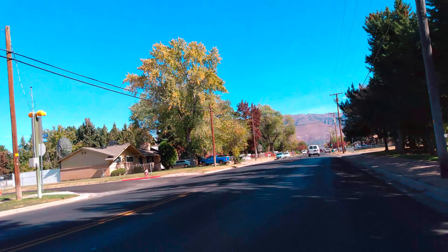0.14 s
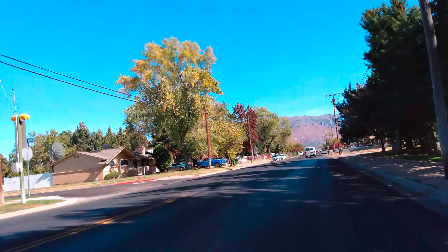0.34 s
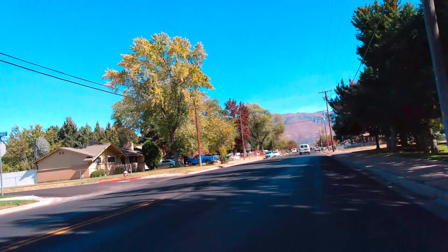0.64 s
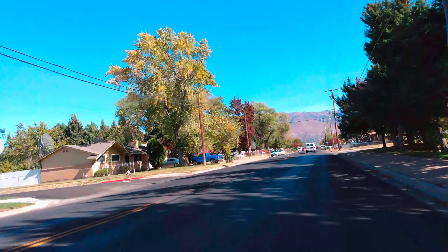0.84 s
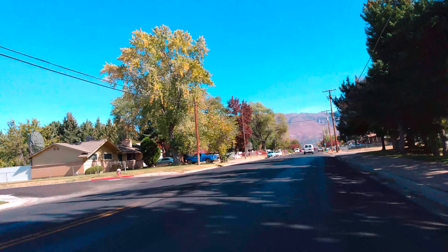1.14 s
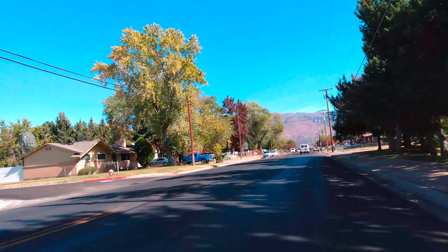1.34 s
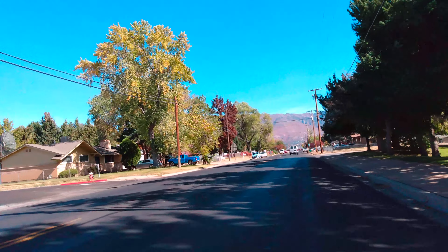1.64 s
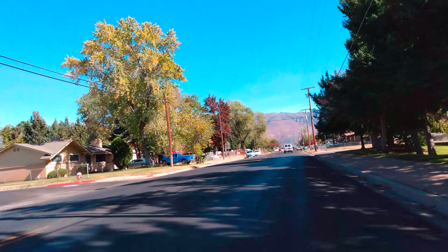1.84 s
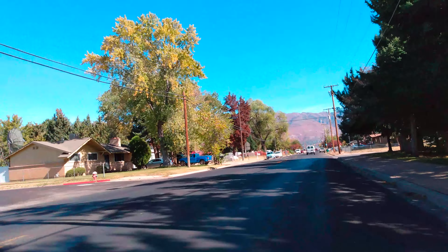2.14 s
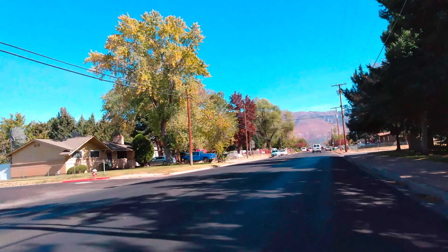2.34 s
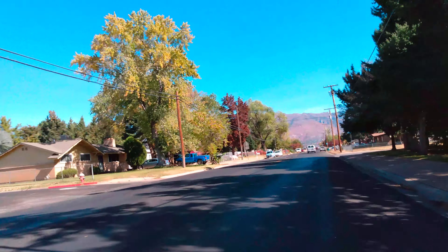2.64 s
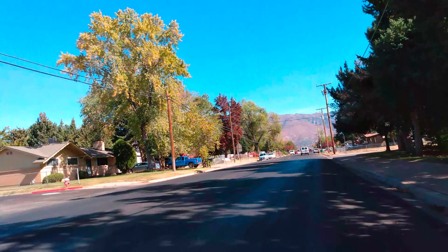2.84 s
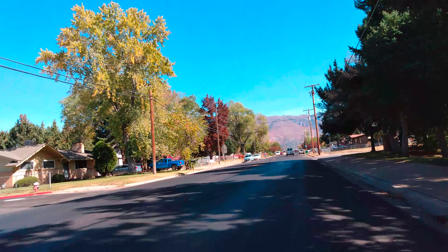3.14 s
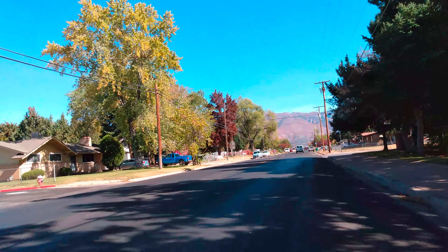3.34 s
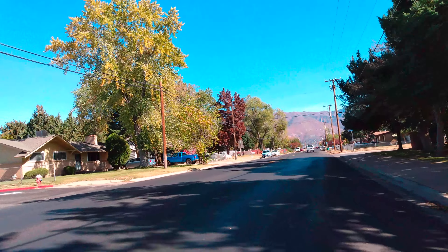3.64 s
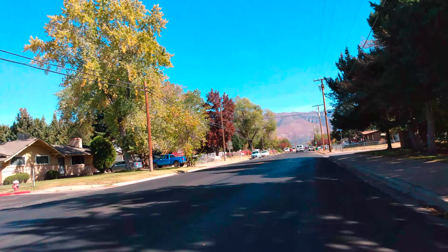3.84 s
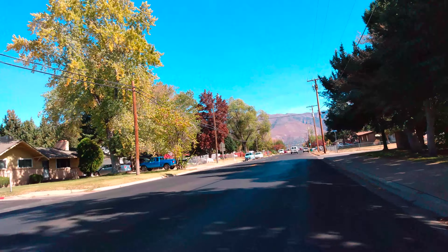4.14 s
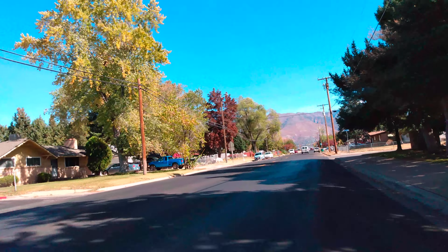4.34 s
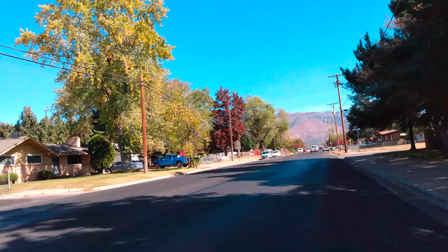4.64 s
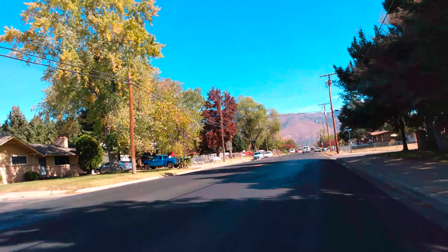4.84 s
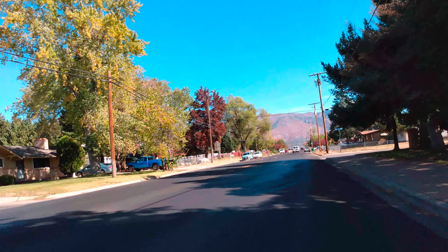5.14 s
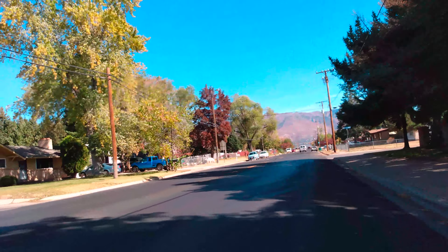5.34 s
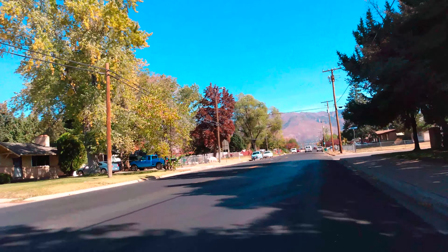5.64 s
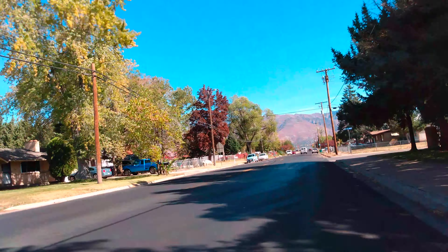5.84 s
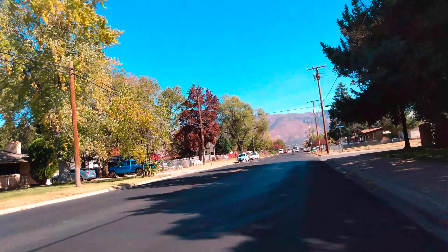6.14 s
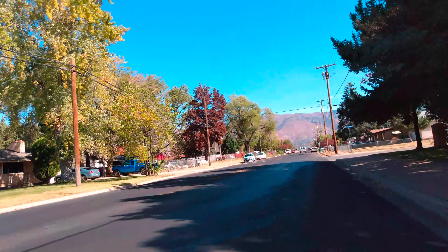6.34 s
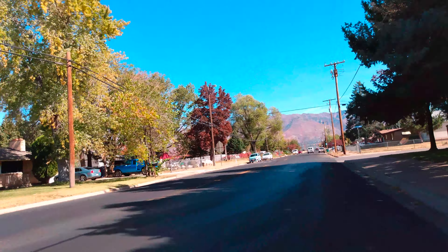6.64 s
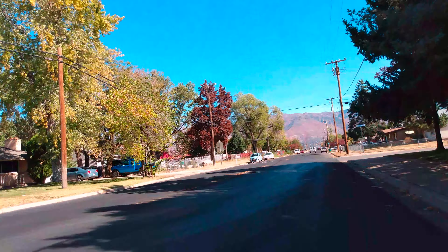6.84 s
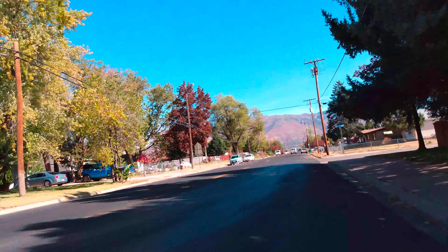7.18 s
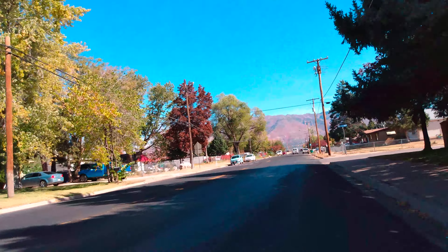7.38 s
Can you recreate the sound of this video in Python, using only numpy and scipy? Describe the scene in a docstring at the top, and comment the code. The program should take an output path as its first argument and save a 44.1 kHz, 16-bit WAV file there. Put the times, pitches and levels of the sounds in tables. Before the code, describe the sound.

Riding a bicycle down a quiet street, a thumb bell is rung in two clattery trilling bouts over tyre rumble and rattles; a car hums past.

```python
"""Thumb bell on a bicycle handlebar

A thumb bell is worked in two bouts while the bicycle rolls down a quiet street. Its dome is a set of
slowly dying sines; clacks, gear noise, tyre rumble, traffic and hiss are shaped noise. Knocks make the
camera's mount on the same bar ring. A bird whistles and, near the end, a car hums past in gliding sines.
Two microphone ports hear it all, and a compressor turns the loud moments down."""
import sys
import numpy as np
from scipy.fft import rfft, irfft, next_fast_len
from scipy.io import wavfile
from scipy.ndimage import uniform_filter1d, map_coordinates

SR = 44100
rng = np.random.default_rng(int(sys.argv[2]) if len(sys.argv) > 2 else 0)


def dump(signal):
    """Clip the signal to [-1, 1] and save it as 16-bit WAV at the path in sys.argv[1]."""
    limited = np.clip(np.atleast_2d(signal).T, -1, 1)
    pcm = np.round(limited * 32767).astype(np.int16)
    wavfile.write(sys.argv[1], SR, pcm)


N = 331191
TIME = np.arange(N) / SR  # s

# Table levels are relative: the functions add offsets of their own.
# hammer blows on the dome: t/s, level/dB, brightness/(dB per octave), place on the rim/deg, clack/dB
BELL_BLOWS = [(1.059, -27, 0, 82, -13.5), (1.1, -30.5, -1, 155, -21), (1.136, -31.5, -1.6, 27.3, -19),
              (1.262, -15.5, -0.3, 148, -16), (1.438, -24, 1, 25.4, -19), (1.464, -23.5, -2.5, 58, -11),
              (1.499, -33.5, -0.2, 55, -29), (1.641, -18.5, 2, 57.3, -15), (1.829, -30.5, 2.5, 91, -23),
              (1.874, -30, 1.1, 123, -18), (2.021, -16.5, 5.5, 25, -25), (2.41, -32.5, -9, 62, -25.5),
              (2.429, -31, -1.5, 129.6, -24), (2.547, -20, 3, 123, -18), (5.138, -30.5, 2, 29, -20.5),
              (5.183, -32, -0.5, 122, -23), (5.274, -20.5, -0.5, 141, -15), (5.414, -29.5, -3, 121, -16),
              (5.46, -36.5, 5.5, 90, -15), (5.565, -22.5, 3.5, 79, -14), (5.713, -28.5, -1.5, 30, -23.5),
              (5.751, -33, 2.3, 87, -18.5), (5.86, -9.5, .4, 64.3, -11)]
# the lever slams on its stop: t/s, level/dB, chatter length/s, thump/dB, click of the mount/dB
LEVER_CLUNKS = [(1.261, -2, 0.017, -9, -14), (1.642, -6, 0.011, -6, -10.5), (2.0187, -3, 0.024, -7, -3),
                (2.546, -3, 0.011, -6, -21), (5.274, -7.5, 0.0144, -7, -7.5), (5.565, -4, 0.013, -10, -17),
                (5.861, 1.5, 0.0048, -13, -10)]
# loudness along the road: t/s, traffic/dB, hiss/dB, tyre rumble/dB
ROAD_LEVELS = [(0, -55, -71, -46), (.33, -60, -75.5, -48), (.75, -54.5, -68, -50), (1, -50, -58, -28),
               (1.3, -48.5, -65, -38), (1.5, -53, -65, -41), (2.1, -54.5, -65, -43.5),
               (2.7, -50, -63.5, -38), (3.2, -54, -63.5, -41), (3.45, -58, -69.5, -48.5),
               (3.9, -55, -63.5, -41), (4.4, -57.5, -67.5, -40), (4.75, -56, -67, -46),
               (4.95, -54.5, -61, -34.5), (5.2, -54, -64, -42.5), (5.8, -60.5, -77, -47),
               (6, -44.5, -59, -26), (6.4, -51, -59, -30.5), (6.65, -47.5, -62.5, -38.5),
               (6.94, -51, -59, -42), (7.15, -50.5, -58, -33), (7.51, -50, -59.5, -39.5)]
# airborne sound at the two ports: f/Hz, left ahead of right/rad, left above right/dB
AIR_PATH = [(0, -3.1, 0), (340, -2.3, 2), (1050, 0, 2), (1850, 2.05, 3.5), (2750, 4.4, 4), (3450, 6, 5),
            (4670, 9.87, 6), (5500, 11.7, 7), (6900, 15.6, 8), (8080, 18.95, 10.5), (11950, 28.7, 11.5),
            (17000, 40, 10)]


def amp(db):
    """Turns dB into a gain."""
    return 10 ** (np.asarray(db) / 20)


def unit(x):
    """Scales a sound to rms 1."""
    return x / np.sqrt(np.mean(x ** 2) + 1e-20)


def curves(rows):
    """Draws straight lines through the rows: one curve for each column after the time."""
    s, *columns = np.transpose(rows)
    return [np.interp(TIME, s, column) for column in columns]


def wobble(rate):
    """A smooth random curve through `rate` random points a second."""
    points = rng.standard_normal(int(N * rate / SR) + 4)
    return map_coordinates(points, [TIME * rate])


def filtered(x, response):
    """Multiplies the spectrum of x by a complex response to frequency."""
    m = next_fast_len(N + SR // 2)
    hz = np.fft.rfftfreq(m, 1 / SR)
    return irfft(rfft(x, m) * response(hz), m)[..., :N]


def noise(spectrum, channels=1):
    """Random noise of rms 1, coloured by rows of f/Hz, level/(dB per Hz) and silent outside them."""
    f, db = np.transpose(spectrum)

    def gain(hz):
        return amp(np.interp(np.log(hz + 1), np.log(f), db, left=-120, right=-120))

    return unit(filtered(rng.standard_normal((channels, N)), gain))


def bursts(times, levels_db, t60, hold=0.):
    """A loudness curve that jumps at each time, holds, then falls by 60 dB in t60 seconds."""
    out, t = np.zeros(N + SR), np.arange(SR // 5) / SR
    for s, db, h in np.broadcast(times, levels_db, hold):
        fall_db = 60 * np.maximum(t - h, 0) / abs(t60)
        out[round(s * SR):][:len(t)] += amp(db - fall_db)
    return out[:N]


def ports(x, path):
    """Gives the left port x itself and the right port x with its level and phase changed by frequency."""
    f, lead, db = np.transpose(path)

    def right(hz):
        return amp(-np.interp(hz, f, db)) * np.exp(-1j * np.interp(hz, f, lead))

    return np.array([x, filtered(x, right)])


def mount(push, modes, soft_hz, sign=1):
    """A push rings resonances (f/Hz, width/Hz, level/dB); a padded contact passes little above soft_hz."""
    def response(f):
        ring = 0
        for k, (centre, width, db) in enumerate(modes):
            resonance = 1j * f * width / (centre * centre - f * f + 1j * f * width)
            ring = ring + sign ** k * amp(db) * resonance
        return ring / (1 + 1j * f / soft_hz) ** 2

    return filtered(push, response)


def street():
    """Traffic, hiss and wind fizz arrive partly from one side, partly from all around; a car hums past."""
    # colour of each noise: f/Hz, level/(dB per Hz)
    traffic_colour = [(150, -8), (300, 3), (600, -0.5), (1000, -8.5), (1350, -10), (1700, -7.5),
                      (2300, -12), (3000, -39)]
    hiss_colour = [(1500, -52), (2600, 3), (4000, -4.5), (5600, -11), (5850, 2.5), (6100, -12), (8000, -42),
                   (9500, -48)]
    fizz_colour = [(5000, -34), (7000, -2), (9000, -6), (12000, 2), (15300, -3.5), (16500, -25)]
    traffic_db, hiss_db, _ = curves(ROAD_LEVELS)
    fizz_db = -80.5 + 0.78 * (hiss_db - hiss_db.mean())  # fizz follows the hiss, but moves less
    layers = ((traffic_db + 6.0, traffic_colour, -10),
              (hiss_db + 1, hiss_colour, -4),
              (fizz_db + 10.5, fizz_colour, -3))
    out = ports(car(), AIR_PATH)
    for db, spectrum, diffuse_db in layers:
        near, *around = noise(spectrum, channels=3)
        both = ports(near, AIR_PATH) + amp(diffuse_db) * np.array(around)
        out = out + amp(db + 3.0 * wobble(18)) * both
    return out


def frame():
    """Shaking of the bar: mount knocks that rebound and clatter, thumps, bumps and lumpy tyre rumble."""
    # knocks of the mount on the bar: t/s, click level/dB
    knocks = [(.069, -30.5), (.38, -39), (.438, -31), (.489, -28), (.548, -40), (.613, -30.5),
              (.674, -39.5), (.73, -25.5), (.83, -29), (.853, -20), (.865, -26), (.908, -9.5),
              (.974, -14.5), (1.035, -12), (1.395, -26.5), (1.497, -30.5), (1.558, -38), (1.597, -29),
              (1.747, -22), (1.951, -43.5), (2.099, -33), (2.147, -30), (2.211, -21), (2.269, -32),
              (2.287, -31.5), (2.332, -22.5), (2.367, -26.5), (2.659, -31), (2.704, -23.5), (2.755, -28),
              (2.816, -37.5), (2.868, -32), (2.91, -27), (2.976, -28), (3.035, -27), (3.13, -40),
              (3.173, -36), (3.22, -28.5), (3.279, -29.5), (3.328, -30), (4.022, -29), (4.309, -20),
              (4.357, -29), (4.402, -24), (4.476, -33.5), (4.628, -41.5), (4.667, -37.5), (4.72, -38),
              (4.775, -32), (4.825, -21.5), (4.883, -18.5), (4.941, -23.5), (4.986, -37), (5.298, -25),
              (5.329, -32), (5.378, -29.5), (5.731, -23), (5.752, -41), (5.976, -24), (6.02, -23.5),
              (6.082, -22.5), (6.149, -36), (6.184, -30), (6.227, -31.5), (6.273, -34.5), (6.335, -28.5),
              (6.372, -22.5), (6.419, -26.5), (6.571, -38), (6.684, -37), (6.743, -33), (6.825, -28),
              (7.058, -40.5), (7.257, -30), (7.31, -27), (7.364, -20), (7.47, -32)]
    # dull road bumps: t/s, level/dB
    dull_bumps = [(3.817, -16), (6.182, -11), (6.266, -14), (6.376, -7.5), (6.88, -17.5), (7.099, -25)]
    # resonances of the mount, low and high, then of the whole bar: f/Hz, width/Hz, level/dB
    thud_modes = [(117.3, 37, 1), (192.8, 50.6, 3.5), (315, 170, -9), (474, 92, -2.5)]
    click_modes = [(490, 190, 3), (756, 128, 8), (997, 318, 4.5), (1332, 394, 5.5), (1842, 362, 0.5),
                   (2030, 98, -33), (2730, 180, -12.5), (3460, 290, -10), (4030, 2000, -18)]
    bar_modes = [(91, 59, 1.5)]
    # colour of the tyre rumble: f/Hz, level/(dB per Hz)
    tread_colour = [(25, -33), (50, -9.5), (90, -0.5), (130, -1.5), (190, -6), (300, -22), (600, -32.5)]
    # vibration through the camera body: f/Hz, left ahead of right/rad, left above right/dB
    body_path = [(0, -3, -4), (82, -3, -0.5), (191.5, -2.5, 4.5), (266, -2.5, 2), (413, -2.5, 4.5),
                 (960, 0.74, 0.5), (1420, -0.45, -3), (1790, -2, -1.5), (2320, 0, 12.5), (2420, -5, -6.5),
                 (3020, -6, 6), (3400, -6, 4.5), (3940, -5, -2.5), (5360, -0.2, 2.5), (6770, 4.5, 2)]
    rumble_db = curves(ROAD_LEVELS)[2]

    # faint knocks in between, louder where the rumble is
    per_s, faint_mean_db, spread_db = 17, -44, 1.5
    draw = rng.standard_normal((int(per_s * N / SR), 2))
    faint = np.clip((np.arange(len(draw)) + .2 * draw[:, 0]) / per_s, 0, TIME[-1])
    above_mean_db = np.interp(faint, TIME, rumble_db) - rumble_db.mean()
    faint_db = faint_mean_db + spread_db * draw[:, 1] + 0.53 * above_mean_db
    road = np.r_[knocks, np.c_[faint, faint_db]]

    # bell blows (8.5 dB below their clack level) and lever clunks jolt the mount too
    jolts = [(s, db - 8.5) for s, *_, db in BELL_BLOWS]
    jolts += [(s, db) for s, *_, db in LEVER_CLUNKS]
    s, db = np.r_[road, jolts].T
    is_jolt = np.arange(len(s)) >= len(road)
    thud_db = -18 + 0.73 * db - 12 * is_jolt  # jolts thud less than road knocks

    # each knock bounces twice, evenly spaced
    chance = rng.uniform(0, 1, (len(s), 3))
    rebound = s + .0115 + 0.003003 * chance[:, 0]  # s
    weaker_db = 3.8 + 5 * chance[:, 1]
    again = 2 * rebound - s
    again_db = db - weaker_db - 12 * chance[:, 2]

    taps = bursts(s, db + 24.0, t60=0.0018)
    taps += bursts(rebound, db + 23 - weaker_db, t60=0.0018)
    taps += bursts(again, again_db + 17.5, t60=0.0023)
    taps = np.diff(taps, prepend=0)  # sharp impulses
    clatter = bursts(s, db - 7.5, t60=0.12) * amp(6.1 * wobble(200))
    rattle = (bursts(s, db + .5, t60=0.009) + clatter) * rng.standard_normal(N)
    thuds = bursts(s + 0.0014, thud_db + 30.0, t60=0.0075)
    thuds += bursts(rebound, thud_db + 36.5 - weaker_db, t60=0.0052)
    thuds += bursts(again, thud_db - db + again_db + 32, t60=0.0081)
    shake = mount(taps + rattle, click_modes, soft_hz=4500, sign=-1.076)
    shake += mount(thuds, thud_modes, soft_hz=497)

    # the whole bar swings once the lever rests
    s, db, hold, thump_db, _ = np.transpose(LEVER_CLUNKS)
    thump = mount(bursts(s + hold, db + thump_db + 24, t60=0.01), bar_modes, soft_hz=400)
    s, db = np.transpose(dull_bumps)
    bumps = mount(bursts(s, db + 16.0, t60=0.0056), thud_modes, soft_hz=123)
    lumps_db = 1.4 * wobble(6) + 5.6 * wobble(25)
    rumble = amp(rumble_db + lumps_db) * noise(tread_colour)[0]
    loose = amp(rumble_db - 13) * noise(tread_colour, channels=2)  # wind on each port alone
    return ports(shake + thump + bumps + rumble, body_path) + loose


def lever():
    """Clunks chatter for a moment, then fade; gear teeth tick and scrape as the lever moves."""
    # gear teeth tick: t/s, level/dB
    tick_times = [(1.0141, -36), (1.0445, -26), (1.126, -26), (1.1593, -37), (1.202, -50), (1.4054, -23),
                  (1.772, -27), (2.2922, -29.5), (2.3687, -29), (5.1053, -49), (5.3682, -37), (5.403, -32),
                  (5.4246, -41), (5.4415, -41), (5.671, -30), (5.6885, -42), (5.7119, -37), (5.8895, -22),
                  (5.919, -28)]
    # gears scrape: t/s, hold/s, level/dB
    scrapes = [(.846, 0.13, -60.5), (1.042, 0.022, -42.5), (1.268, 0.0022, -23), (1.398, 0.088, -50),
               (1.644, 0.0067, -29), (1.775, .002, -41.5), (1.838, 0.0024, -41), (1.875, .002, -44),
               (2.018, 0.011, -29.5), (2.294, 0.0015, -48), (2.368, .004, -45), (2.419, 0.0066, -39.5),
               (2.544, 0.018, -36), (5.127, 0.058, -47), (5.278, 0.0044, -25.5), (5.37, .002, -44),
               (5.401, 0.054, -42), (5.576, .01, -45), (5.695, 0.055, -42.5), (5.863, .004, -27)]
    # colours of clunk and scrape: f/Hz, level/(dB per Hz)
    clunk_colour = [(88, -35), (150, 1.5), (1470, -3.5), (1840, -5.5), (2160, -6), (2420, -5.5),
                    (2710, -0.5), (3800, -14.5), (4760, -18), (7000, -23.5), (9100, -29), (15400, -120)]
    gear_colour = [(600, 5.5), (2200, 4), (4000, 2), (7000, -2.5), (10000, -0.5), (14500, 4.5),
                   (16500, -24)]
    # ringing of the lever's stop: f/Hz, width/Hz, level/dB
    stop_modes = [(2760, 164, -1), (3660, 100, -9.5), (1675, 71, -3.5)]
    s, db, hold, *_ = np.transpose(LEVER_CLUNKS)
    since = np.abs(TIME - s[np.searchsorted(s, TIME, 'right') - 1])  # s after the latest clunk
    sag = amp(-343 * since)  # the chatter weakens as it goes, in dB per s
    chatter = sag * bursts(s, db + 2.5, 0.0025, hold)
    clunk = (chatter + bursts(s, db - 14, t60=0.11)) * noise(clunk_colour)[0]
    rough_push = chatter * amp(12.5 + 7.8 * wobble(400)) * rng.standard_normal(N)
    clunk += mount(rough_push, stop_modes, soft_hz=9000)

    s, db = np.transpose(tick_times)
    tick_noise = noise([(1500, -19), (3000, -16), (8000, -14), (14000, 5), (16500, -20)])[0]
    ticks = bursts(s, db + 8.5, t60=0.0078) * tick_noise

    rise, fall = 2200, 701  # dB per s
    effort = 0
    for s, hold, db in scrapes:
        before, after = np.maximum(s - TIME, 0), np.maximum(TIME - s - hold, 0)
        effort = effort + amp(db - rise * before - fall * after)
    scrape = effort * amp(8 + 5.1 * wobble(220)) * noise(gear_colour)[0]
    return clunk + ticks + scrape


def bell():
    """Each blow ends the old ring and starts every mode by how much it moves there; the hammer clacks."""
    # dome modes, in split pairs with 2, 3, 4 and 5 waves round the rim:
    # f/Hz, time to fall 60 dB/s, level/dB, turn of the pattern/deg
    dome_modes = [(1810, 2.97, -9.9, 73), (1860.5, 3.14, 1.1, -17), (4640, 1.18, -1.4, 52),
                  (4686, 1.0, 2.7, -38), (8041, 0.43, -7.5, 113), (8105, 0.52, -1.1, 23),
                  (11884, 0.29, 2.3, 48), (11999, 0.24, 13, -42)]
    node_leak, pivot_hz = .003, 4660  # a still place rings faintly; brightness tilts about the pivot
    s, db, bright_db, place, clack_db = np.transpose(BELL_BLOWS)
    last = np.searchsorted(s, TIME) - 1  # latest blow; -1 before the first
    since = TIME - s[last]
    phase = rng.uniform(0, 2 * np.pi, (len(s), len(dome_modes)))
    ring = 0
    for k, (hz, t60, mode_db, turn) in enumerate(dome_modes):
        waves = 2 + k // 2
        motion = np.sqrt(np.cos(np.radians(waves * place + turn)) ** 2 + node_leak)
        start = amp(db + mode_db + bright_db * np.log2(hz / pivot_hz)) * motion
        decay = start[last] * amp(-60 * np.abs(since) / t60) * (last >= 0)
        soft_decay = uniform_filter1d(decay, size=9)  # softens the jump at a blow
        ring = ring + soft_decay * np.sin(2 * np.pi * hz * TIME + phase[last, k])
    clack_noise = noise([(900, -36), (2200, 12.5), (3500, -12.5), (8000, -13.5), (15000, -19)])[0]
    return ring + bursts(s, clack_db + .8, t60=0.019) * clack_noise


def bird():
    """Five far-off whistles, sines that arch up and down; the right port gets them weaker and inverted."""
    # calls: t/s, level/dB
    chirps = [(3.702, -48), (4.025, -53), (4.35, -57), (4.674, -52), (5.009, -54)]
    # shape of one call: t/s, f/Hz, level/dB
    call_shape = [(0, 1260, 2), (0.015, 1267, 4), (.045, 1418, 11), (.06, 1300, 8), (0.074, 1230, 1)]
    out = np.zeros(N)
    u, hz, shape_db = np.transpose(call_shape)
    t = np.arange(round(u[-1] * SR)) / SR
    phase = 2 * np.pi * np.cumsum(np.interp(t, u, hz)) / SR
    for s, db in chirps:
        out[round(s * SR):][:len(t)] += amp(db + np.interp(t, u, shape_db)) * np.sin(phase)
    return np.array([out, -amp(-6.5) * out])


def car():
    """Engine tones of a passing car: sines that swell, glide upward and fade."""
    # tones: t/s, length/s, from f/Hz, to f/Hz, level/dB
    engine_tones = [(6.028, .6, 340, 366, -45.5), (6.024, .6, 408, 436, -46.5), (6.078, .35, 490, 510, -53),
                    (6.448, .4, 545, 586, -51), (6.847, .55, 400, 446, -48), (7.006, .45, 345, 368, -45.5),
                    (6.996, .42, 525, 553, -46.5)]
    out = np.zeros(N)
    for s, length, from_hz, to_hz, db in engine_tones:
        u = np.clip((TIME - s) / length, 0, 1)  # progress through the tone
        hz = from_hz + (to_hz - from_hz) * np.sin(np.pi / 2 * u)
        swell = amp(db + 2.0 + 1.7 * wobble(8)) * np.sin(np.pi * u) ** 0.27
        out += swell * np.sin(2 * np.pi * np.cumsum(hz) / SR)
    return out


def scene():
    """Adds up everything that reaches the two ports."""
    return street() + frame() + ports(lever() + bell(), AIR_PATH) + bird()


def record(dry):
    """A look-ahead compressor steered by the left port, letting go at a steady rate, then band limits."""
    threshold_db, share, release = -23, .74, 76  # release in dB per s
    level_db = 10 * np.log10(np.abs(uniform_filter1d(dry[0] ** 2, size=500)) + 1e-12)
    need_db = share * np.maximum(level_db - threshold_db, 0)
    climb_db = release * TIME
    cut_db = np.maximum.accumulate(need_db + climb_db) - climb_db  # jumps up, falls steadily
    squeezed = dry * amp(-uniform_filter1d(cut_db, size=200))

    def band(hz):
        return (hz < 16800) * (1j * hz / (32 + 1j * hz)) ** 2

    return filtered(squeezed, band)


dry = scene()
out = record(dry)
dump(out)
```